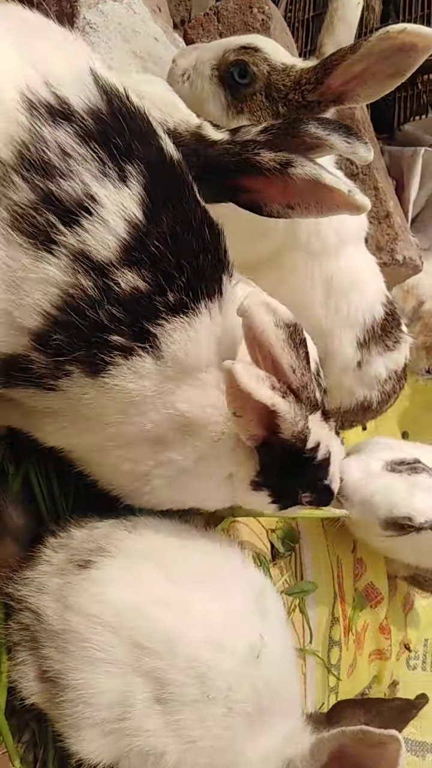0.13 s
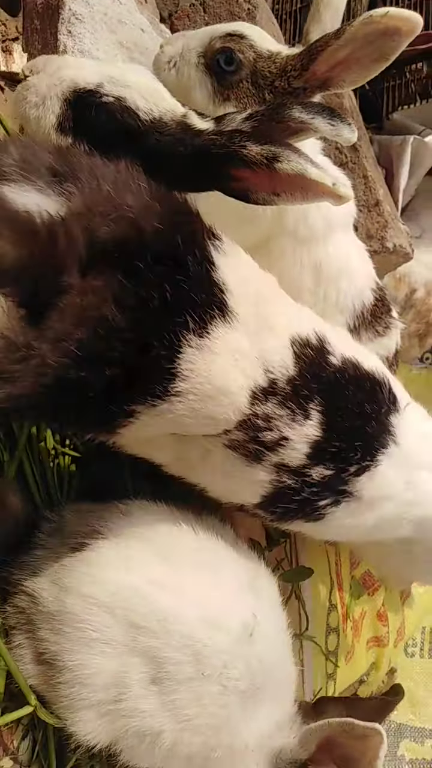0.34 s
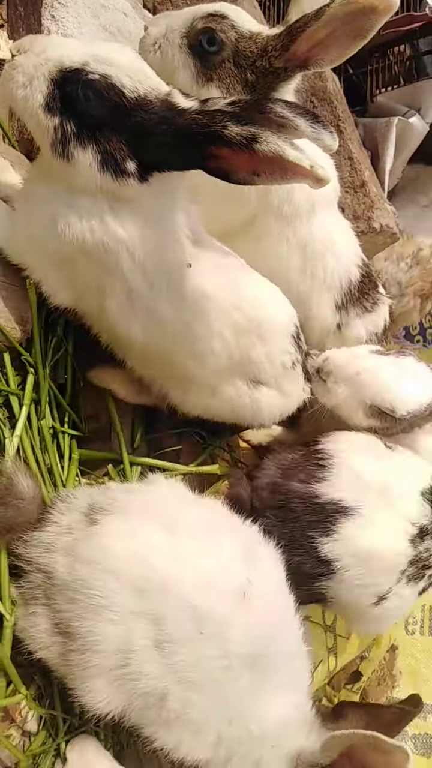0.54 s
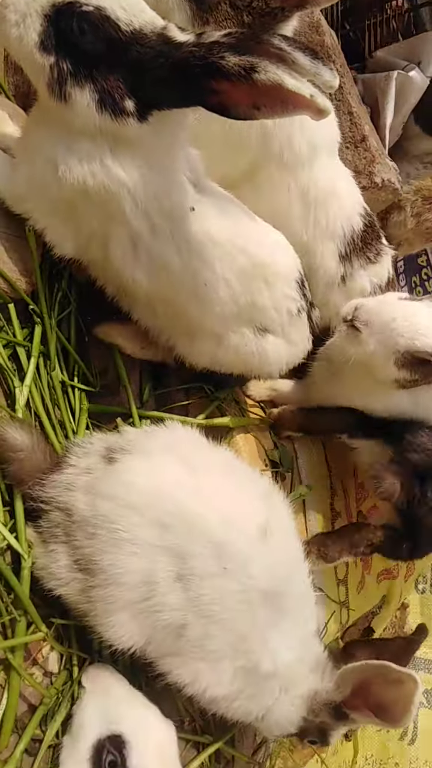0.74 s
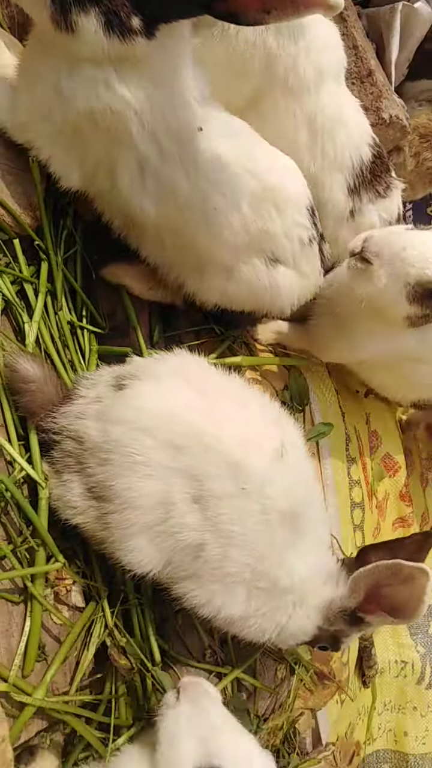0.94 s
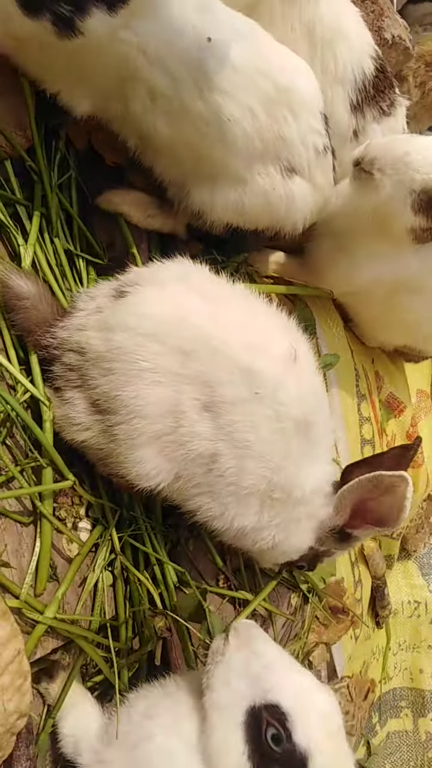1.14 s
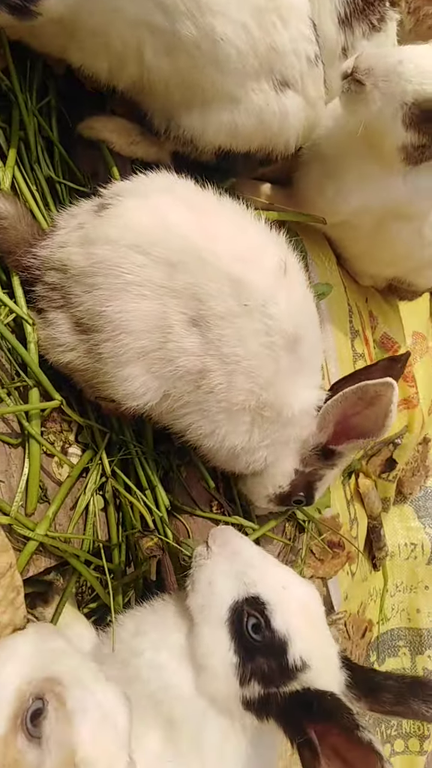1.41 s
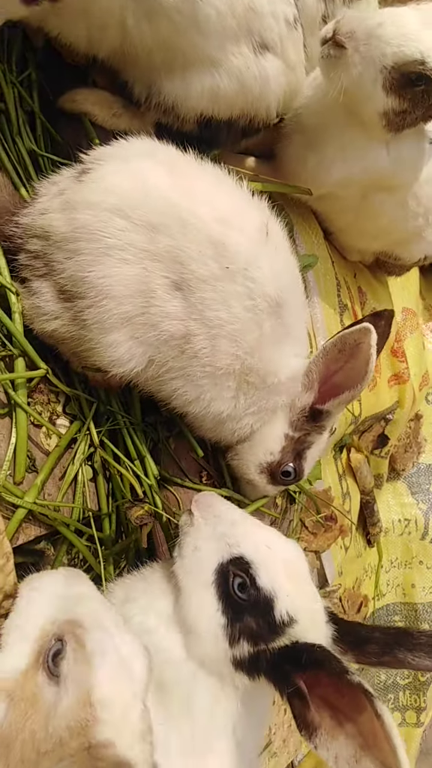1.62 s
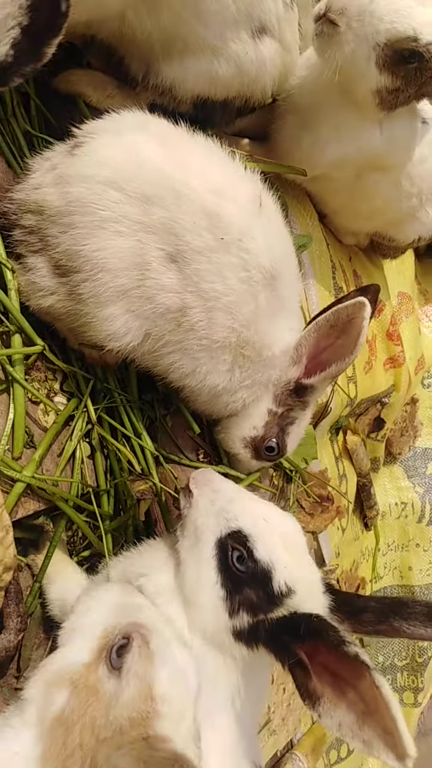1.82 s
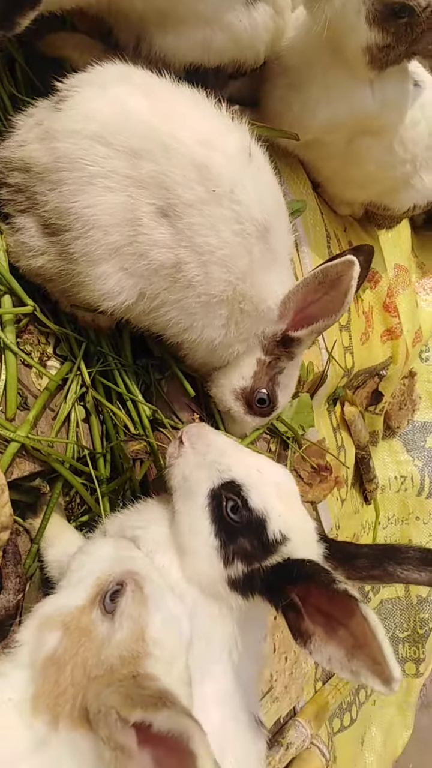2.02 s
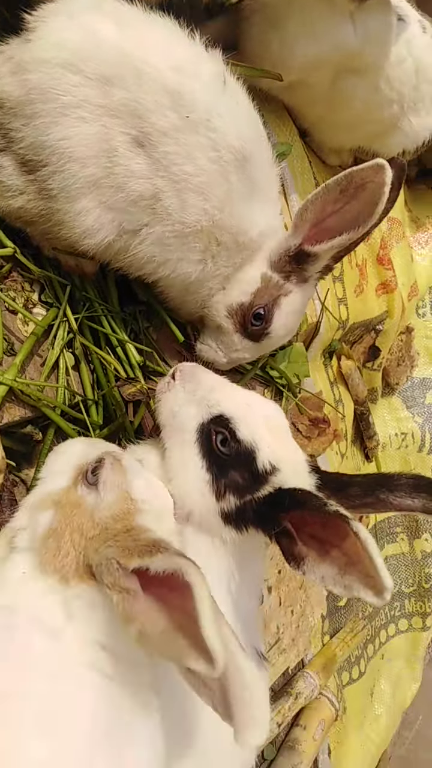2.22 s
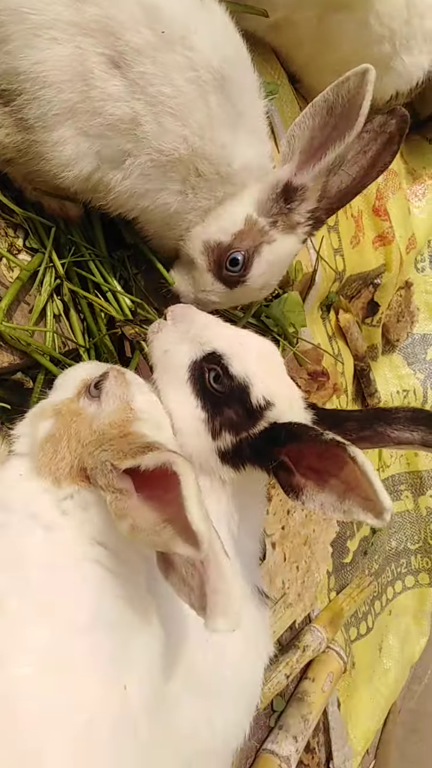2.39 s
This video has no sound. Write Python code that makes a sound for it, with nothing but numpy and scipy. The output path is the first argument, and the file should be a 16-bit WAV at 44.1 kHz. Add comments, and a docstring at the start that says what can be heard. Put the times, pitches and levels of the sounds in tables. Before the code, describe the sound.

Crisp grass rustling and stem snaps from feeding rabbits, a thumping hop, then echoing sparrow chirps

```python
"""Rabbits feed on cut greens spread on a plastic sack in a walled yard, over a wavering hum, rumble and still air.
From the start jaws and paws rustle the stems: strokes of hiss and crackle, mostly on the right as they brighten.
At 0.2 s stems snap with short rings; just after 0.5 s a rabbit hops, and its paws knock as damped tones.
Sparrows give a few notes at the start and many from 0.67 s on: gliding whistles from the left, deep in echo.
Fur and paws scuffle on the sack, loudest at the hop; faint blurred noise bands come and go in the distance."""
import sys
import numpy as np
from scipy import signal
from scipy.fft import rfft, irfft, next_fast_len
from scipy.io import wavfile
from scipy.ndimage import uniform_filter1d, map_coordinates

SR = 44100
rng = np.random.default_rng(int(sys.argv[2]) if len(sys.argv) > 2 else 0)


def linear_from_db(decibels):
    """Turn decibels (scalar or array-like) into linear amplitude factors; 0 gives 1."""
    return 10 ** (np.asarray(decibels, float) / 20)


def pcm_store(signal):
    """Save signal as 16-bit PCM."""
    levels = np.round(np.clip(np.atleast_2d(signal), -1, 1) * 32767)
    wavfile.write(sys.argv[1], SR, levels.astype(np.int16).T)


N = 112454  # length in samples
LEAD_S = 0.1  # room ahead of time zero for sounds that have already begun


def unit(x):
    """Scales x to an rms of 1."""
    return x / np.sqrt(np.mean(x ** 2) + 1e-20)


def along(points, hz):
    """Reads a (pitch_hz, level_db) table on a log pitch axis, dropping sharply beyond its ends."""
    f, v = np.transpose(points)
    return np.interp(np.log(hz + 1), np.log(f + 1), v, left=v[0] - 20, right=v[-1] - 40)


def curve(rows):
    """Reads a (time_s, level_db) table at every sample."""
    return np.interp(np.arange(N) / SR, *np.transpose(rows))


def wobble(rate, size=N):
    """A smooth random curve through `rate` random points a second."""
    points = rng.standard_normal(size // 20 + 9)
    return map_coordinates(points, [2 + np.arange(size) * rate / SR], mode="mirror")


def filtered(x, response):
    """Multiplies the spectrum of x by a response that depends on frequency."""
    m = next_fast_len(N + 8192)
    return irfft(rfft(x, m) * response(np.fft.rfftfreq(m, 1 / SR)), m)[..., :N]


def pair(x, alike):
    """Mixes two unrelated signals into left and right; alike 0 is unrelated, 1 is identical."""
    u = np.arccos(np.clip(alike, 0, 1)) / 2
    shared = np.cos(u) * x[0]
    opposed = np.sin(u) * x[1]
    return np.array([shared + opposed, shared - opposed])


def rush(spectrum, alike, x=None):
    """Colours stereo noise, or a given signal x, with a spectrum and scales it to an rms of 1."""
    x = rng.standard_normal((2, N)) if x is None else x
    return unit(filtered(pair(x, alike), lambda hz: linear_from_db(along(spectrum, hz))))


def patches(x, depth_db):
    """Gives x random patches of gain in time and frequency, at an rms of 1."""
    z = signal.stft(x, nperseg=512)[2]
    field = uniform_filter1d(rng.standard_normal(z.shape), 7, 1)
    field = uniform_filter1d(field, 7, 2)
    return unit(signal.istft(z * linear_from_db(depth_db * unit(field)), nperseg=512)[1][:, :N])


def crackle(per_s):
    """Sparse clicks of varied size, unrelated in the two channels."""
    clicks = rng.random((2, N)) < per_s / SR
    return clicks * rng.uniform(-1, 1, (2, N)) * linear_from_db(rng.uniform(-12, 0, (2, N)))


def sides(db):
    """Left and right gains for a left-minus-right level difference."""
    return linear_from_db(np.array([db / 2, -db / 2]))


def add(out, s, x):
    """Mixes x into out at time s; out starts LEAD_S early."""
    i = round((s + LEAD_S) * SR)
    out[:, i:i + x.shape[1]] += x


def trimmed(out):
    """Cuts off the lead-in and the overhang."""
    return out[:, round(LEAD_S * SR):][:, :N]


# how long the yard's echo takes to fall by 60 dB: pitch_hz, t60_s
YARD_DECAY = [(300, 0.47), (3000, 0.63), (6000, 0.5), (12000, 0.17)]


def yard(x):
    """Walls return a dense echo: fresh noise in each ear that decays at its own speed at each pitch."""
    hz, t, z = signal.stft(rng.standard_normal((2, SR // 2)), SR, nperseg=256)
    t60 = np.interp(hz, *np.transpose(YARD_DECAY))[:, None]
    tail = signal.istft(z * linear_from_db(-60 * t / t60), SR, nperseg=256)[1]
    return signal.fftconvolve(x[None], tail / np.linalg.norm(tail[0]), axes=1)


# colour of the still air: pitch_hz, relative level_db per Hz
AIR_COLOUR = [(30, 20), (300, 9), (700, 3), (2000, -16), (4000, -40), (14000, -26)]


def air():
    """Still air is a faint steady noise with patches of gain."""
    level_db = -69.5
    return linear_from_db(level_db) * patches(rush(AIR_COLOUR, 0.7), depth_db=3.5)


# loudness of the distant rumble: time_s, level_db
RUMBLE_LEVEL = [(0.0, -52), (0.05, -44), (0.13, -57), (0.16, -49), (0.21, -61.5), (0.42, -51.5),
                (0.44, -38.5), (0.57, -52), (0.59, -34.5), (0.66, -46), (0.69, -49.5), (0.96, -49.5),
                (1.13, -63), (1.15, -53.5), (1.24, -59.5), (1.31, -54), (1.45, -57.5), (1.49, -59.5),
                (1.71, -54.5), (1.74, -51), (1.78, -51.5), (1.96, -59), (2.47, -56), (2.55, -65)]
# colour of the distant rumble: pitch_hz, relative level_db per Hz
RUMBLE_COLOUR = [(25, -30), (45, -4), (80, -0.5), (125, 3), (165, -5), (210, -6), (300, -9), (450, -15),
                 (600, -38.5)]


def rumble():
    """Distant rumble is low noise, nearly the same in both ears, whose loudness comes in lumps."""
    return rush(RUMBLE_COLOUR, 0.9) * linear_from_db(curve(RUMBLE_LEVEL) + 1.5 * wobble(15))


# loudness of the hum: time_s, level_db
HUM_LEVEL = [(0.0, -61), (0.09, -49), (0.13, -60.5), (0.32, -45), (0.39, -53), (0.42, -39.5), (0.51, -56.5),
             (0.56, -45.5), (0.77, -56.5), (0.85, -47), (0.89, -55.5), (1.04, -43), (1.3, -57.5),
             (1.32, -48.5), (1.56, -98), (1.65, -47.5), (1.71, -65), (1.74, -45.5), (1.94, -69),
             (1.99, -56.5), (2.09, -70), (2.16, -56), (2.27, -99), (2.3, -56), (2.4, -52.5), (2.47, -77),
             (2.52, -48), (2.55, -57)]


def hum():
    """A low hum is a drifting tone inside a narrow band of noise, wavering in loudness."""
    centre_hz, drift_hz = 387.4, 4
    width_hz, skirt_hz, skirt_db = 12.6, 60, -7
    line_db, flutter_db = 1, 2  # tone over the noise band; random waver

    def peak(f):
        core = np.exp(-((f - centre_hz) / width_hz) ** 2)
        return core + linear_from_db(skirt_db) * np.exp(-((f - centre_hz) / skirt_hz) ** 2)

    phase = 2 * np.pi * np.cumsum(centre_hz + drift_hz * wobble(18)) / SR
    line = np.sqrt(2) * np.sin(phase)  # rms 1
    blur = unit(filtered(pair(rng.standard_normal((2, N)), 0.42), peak))
    tone = unit(linear_from_db(line_db) * line + blur)
    return tone * linear_from_db(curve(HUM_LEVEL) + flutter_db * wobble(44.52))


# faint far-off tones: start_s, t60_s, pitch_hz, width_hz, level_db
FAINT_TONES = [(-.02, 0.6, 191.5, 34, -39), (1.64, 1, 880, 310, -73.5), (0.198, 0.029, 1670, 149, -54.5),
               (.21, 0.11, 883, 60, -66), (0.282, 1, 1090, 89, -55), (.58, 0.68, 213, 30.6, -40),
               (.63, 0.31, 640, 151, -73), (0.743, 0.32, 810, 131, -52), (0.748, 0.25, 2010, 201, -49.5),
               (.87, 0.16, 747, 80, -56), (.99, 0.61, 653, 60, -65), (1.383, 0.52, 686, 50.4, -61),
               (1.389, 0.23, 1226, 80.6, -61), (1.587, 0.04, 2070, 224, -57.5), (1.661, 0.4, 192, 25, -44),
               (1.73, 0.9, 313, 30, -47.5), (1.902, 0.22, 2390, 264, -50.5), (.56, 0.6, 610, 280, -45.5),
               (1.47, 1, 88, 43, -53.5), (2.009, 0.51, 996, 60, -65), (2.081, 0.39, 840, 30, -69.5),
               (2.124, 0.49, 275.6, 25.5, -46), (2.293, 0.7, 324, 31, -50)]
# the far-off tones lean right near 200 Hz: pitch_hz, left_minus_right_db
FAR_LEAN = [(130, 2), (195, -17.5), (260, 1.5)]


def blurs():
    """Faint blurred tones are narrow bands of noise that swell quickly and fade."""
    t = np.arange(N) / SR
    rise_s = 0.029  # climbs the last 20 dB to the peak
    out = 0
    for s, t60, hz, width_hz, db in FAINT_TONES:
        def response(f):
            lean = sides(np.interp(f, *np.transpose(FAR_LEAN)))
            return lean * np.exp(-((f - hz) / width_hz) ** 2)

        band = unit(filtered(pair(rng.standard_normal((2, N)), 0.42), response))
        after = t - s - 0.015  # time from the peak
        loss_db = np.where(after < 0, 20 * (after / rise_s) ** 2, 60 * after / t60)
        out = out + band * linear_from_db(db - loss_db)
    return out


# sparrow notes before the direct and echo gains:
# start_s, length_s, first_pitch_hz, last_pitch_hz, level_db, warble_hz (pitch scatter)
SPARROW_NOTES = [(-.06, 0.072, 5166, 4377, -41.5, 537), (-.02, 0.048, 4400, 3180, -41, 463),
                 (0.121, 0.033, 5800, 6700, -49.5, 295), (0.669, 0.021, 6810, 6670, -41, 202),
                 (0.689, 0.02, 4610, 5960, -33.5, 207), (0.712, .026, 5100, 3460, -38.5, 450),
                 (0.739, 0.01, 4280, 5150, -40, 400), (0.762, 0.014, 3063, 3900, -36.5, 102),
                 (0.781, 0.016, 3400, 4450, -41.5, 398), (0.926, .016, 3410, 3360, -42.5, 149),
                 (0.93, 0.0453, 3100, 2637, -44.5, 153), (1.084, 0.02, 3740, 3684, -41, 90.5),
                 (1.092, 0.04, 3285, 2735, -45, 304), (1.111, 0.057, 4650, 4750, -50, 596),
                 (1.278, 0.09, 5000, 4460, -49.5, 433), (1.55, 0.012, 3300, 3300, -53, 79),
                 (1.564, 0.064, 3870, 4924, -41.5, 408), (1.596, 0.043, 6150, 6840, -41, 446),
                 (1.617, 0.038, 5000, 5336, -34.5, 453), (1.646, 0.046, 4105, 4600, -39, 557),
                 (1.698, 0.035, 4104, 2954, -33.5, 460), (1.772, 0.036, 5300, 5360, -45, 200),
                 (1.89, 0.044, 5590, 3138, -43.5, 550), (1.91, 0.044, 4000, 4980, -43.5, 510),
                 (2.01, 0.021, 5200, 3400, -46, 293), (2.057, 0.045, 3400, 2923, -46.5, 208),
                 (2.044, 0.027, 4480, 4360, -46.5, 297), (2.104, 0.023, 5250, 5260, -41.5, 150),
                 (2.1, .06, 4530, 4105, -53, 396), (2.144, 0.015, 5090, 5350, -44, 152),
                 (2.196, 0.029, 4620, 5766, -42, 413), (2.193, 0.042, 8270, 6900, -62, 313),
                 (2.46, .05, 7570, 7700, -63, 388), (1.304, 0.062, 4270, 3780, -55, 296),
                 (1.368, 0.07, 5014, 4420, -51.5, 360), (-.03, 0.024, 6100, 6070, -48, 500),
                 (2.08, 0.05, 2907, 2684, -56, 201), (2.014, 0.02, 3510, 3090, -42.5, 205),
                 (2.331, 0.091, 3393, 2896, -56.5, 79), (2.442, 0.038, 5230, 5560, -41, 350),
                 (2.485, 0.037, 6680, 6720, -48, 197), (2.497, 0.057, 3570, 5680, -40, 330),
                 (2.515, 0.065, 5650, 4290, -36, 465)]


def sparrows():
    """Each note is a hoarse, unsteady whistle that glides, mostly heard through the yard."""
    direct_db, direct_pan_db = 0.5, 10  # pans are left minus right
    echo_db, echo_pan_db, echo_delay_s = 2.5, 5, 0.009
    left_lag_s = 0.00025  # the left channel hears the direct notes this much later
    warbles_per_s, buzz_db, buzz_per_s, overtone_db = 170, 4.5, 250, -48
    lag = round(left_lag_s * SR)
    out = np.zeros((2, N + 2 * SR))
    for s, length, hz0, hz1, db, warble_hz in SPARROW_NOTES:
        t = np.arange(round(length * SR)) / SR
        glide = hz0 + (hz1 - hz0) * t / length
        warble = np.sin(2 * np.pi * warbles_per_s * t + 2 * wobble(warbles_per_s, len(t)))
        phase = 2 * np.pi * np.cumsum(glide + warble_hz * warble) / SR
        swell = np.sin(np.pi * t / length) ** 0.9
        shape = linear_from_db(db + buzz_db * wobble(buzz_per_s, len(t))) * swell
        note = shape * (np.sin(phase) + linear_from_db(overtone_db) * np.sin(2 * phase))
        direct = np.array([np.pad(note, (lag, 0)), np.pad(note, (0, lag))])
        add(out, s, linear_from_db(direct_db) * sides(direct_pan_db)[:, None] * direct)
        add(out, s + echo_delay_s, linear_from_db(echo_db) * sides(echo_pan_db)[:, None] * yard(note))
    return trimmed(out)


# loudness of fur and paws on the sack: time_s, level_db
SCUFFLE_LEVEL = [(0.0, -87), (0.03, -68.5), (0.17, -79), (0.2, -80.5), (0.23, -71), (0.33, -55.5),
                 (0.5, -45), (0.53, -40.5), (0.545, -38), (0.72, -71), (0.74, -66), (0.82, -65.5),
                 (1.06, -62), (1.16, -71.5), (1.26, -66.5), (1.31, -70), (1.4, -73.5), (1.86, -74.5),
                 (1.91, -68.5), (2.0, -76), (2.07, -67), (2.16, -75.5), (2.51, -76.5), (2.55, -68)]
# colour of the plastic sack: pitch_hz, relative level_db per Hz
SACK_COLOUR = [(450, 17), (600, -8), (900, -4.5), (1500, -1), (2400, -0.5), (3200, -5)]


def scuffle():
    """Fur and paws drag on the sack as patchy noise in lumps, with small ticks."""
    lumps_db, ticks_db = 2, -7  # random waver; ticks against the drag
    drag = patches(rush(SACK_COLOUR, 0.073), depth_db=5.5)
    ticks = linear_from_db(ticks_db) * rush(SACK_COLOUR, 0.15, crackle(200))
    return linear_from_db(curve(SCUFFLE_LEVEL) + lumps_db * wobble(36.4)) * (drag + ticks)


# paws on the hollow ground and sack: start_s, level_db (6 dB is added when played), pitch_hz, t60_s
PAW_KNOCKS = [(0.433, -45, 1130, 0.049), (0.442, -25.5, 97.5, 0.094), (.537, -12, 448, 0.016),
              (0.5443, -5, 435, 0.012), (.433, -36, 1840, 0.011), (0.5382, -29, 2400, 0.005),
              (.538, -34, 544, 0.089), (.538, -16.5, 990, 0.0068), (0.506, -28, 1090, 0.0072),
              (.551, -32, 2520, 0.0064), (.568, -65, 2160, 0.0063), (0.602, -30, 189, 0.062),
              (0.647, -23.5, 278, 0.024), (0.748, -33, 1990, 0.011), (1.299, -36.5, 104.6, 0.15),
              (1.734, -19, 111, 0.039)]


def knocks():
    """Each knock of a paw sounds as one damped tone, the same in both ears."""
    out, t = np.zeros((2, N + 2 * SR)), np.arange(SR // 4) / SR
    for s, db, hz, t60 in PAW_KNOCKS:
        onset = 1 - np.exp(-t * hz * 0.6)
        knock = linear_from_db(db + 6 - 60 * t / t60) * np.sin(2 * np.pi * hz * t) * onset
        add(out, s, np.ones((2, 1)) * knock)
    return trimmed(out)


# snapping stems: start_s, level_db (before onset and crack), pitch_hz, left_minus_right_db
STEM_SNAPS = [(.1938, -30, 5500, 0), (.1965, -31, 3200, 0), (.1977, -12, 6000, 2), (.2007, -14, 6400, 2),
              (.2013, -19, 6400, 2), (.2042, -12, 6800, -2), (.2077, -28, 7000, 0), (.2593, -30, 6000, 1),
              (.3157, -25, 6500, 1), (.325, -29, 12500, -3), (.5068, -23, 5300, 1), (.6355, -27, 6500, 1),
              (.823, -35, 7500, 3), (1.0245, -19, 7800, 2), (1.043, -22, 6000, 6), (1.057, -29, 6600, 4),
              (1.161, -36, 11000, -5), (1.173, -37, 12000, -5), (1.891, -37, 10500, -5),
              (2.109, -36, 10500, -5)]


def snaps():
    """A snapping stem gives a very brief ring with a noisy crack, and a little yard echo."""
    t60_s, crack_gain, echo_db = 0.0028, 0.6, -10.5
    out, t = np.zeros((2, N + 2 * SR)), np.arange(SR // 4) / SR
    for s, db, hz, pan_db in STEM_SNAPS:
        crack = np.diff(rng.standard_normal((2, len(t) + 2)), 2) / 2  # bright noise
        ring = np.sin(2 * np.pi * hz * t)
        shape = linear_from_db(db - 60 * t / t60_s) * (1 - np.exp(-t / 0.0001))
        snap = shape * (ring + crack_gain * crack)
        add(out, s, sides(pan_db)[:, None] * snap)
        add(out, s, linear_from_db(echo_db) * yard(snap[0, :900]))
    return trimmed(out)


# strokes through the stems: peak_s, rise_s (last 20 dB), fall_t60_s, level_db, left_minus_right_db
STEM_STROKES = [(.0, .03, 0.39, -47, 1), (.14, 0.015, 1, -56, -12), (0.288, 0.063, 0.27, -40.5, -2),
                (0.318, 0.025, 0.63, -37, -7), (0.361, 0.083, 0.42, -36, -0.5),
                (.44, 0.02, 0.6, -41.5, -0.5), (0.509, 0.0094, 0.074, -35, 0.5),
                (0.558, 0.033, 0.25, -40.5, -0.5), (0.639, 0.044, 1, -41, -3.5), (.76, 0.033, 1, -47, 2),
                (0.833, 0.036, 0.94, -40, -2.5), (1.012, 0.059, 0.65, -45.5, -8.5),
                (1.052, 0.031, 0.29, -37.5, 1), (1.163, 0.0095, 0.49, -49.5, -3),
                (1.256, 0.03, 0.25, -40, -6), (1.461, 0.026, 0.14, -58, -16.5),
                (1.508, 0.059, 0.42, -61, -18), (1.628, 0.044, 0.8, -55.5, 11),
                (1.704, 0.039, 0.26, -40.5, -5), (1.898, 0.023, 0.35, -42, -7.5),
                (2.112, 0.026, 0.47, -51, -7.5), (2.25, 0.062, 1, -62, -6), (2.52, 0.025, 1, -60, 11)]
# colour of the rustling stems: pitch_hz, relative level_db per Hz
STEM_COLOUR = [(1200, -33), (2000, -15), (2800, -4.5), (4000, -2), (6500, -2.5), (8500, -7.5),
               (11000, -8.5), (14000, -13)]
# the rustle leans further right as it gets brighter: pitch_hz, left_minus_right_db
STEM_LEAN = [(3000, 6.5), (7000, 6), (12000, -6.5)]


def stems():
    """Rubbed stems hiss and crackle under each stroke: a smooth rise, an exponential fall."""
    crackle_db = -10  # against the hiss
    t = np.arange(N) / SR
    power = 0
    for s, rise, fall, db, pan_db in STEM_STROKES:
        loss_db = np.where(t < s, 20 * ((t - s) / rise) ** 2, 60 * (t - s) / fall)
        power = power + (linear_from_db(db - loss_db) * sides(pan_db)[:, None]) ** 2
    rustle = rush(STEM_COLOUR, 0.033) + linear_from_db(crackle_db) * rush(STEM_COLOUR, 0.47, crackle(900))
    rustle = filtered(rustle, lambda hz: sides(np.interp(hz, *np.transpose(STEM_LEAN))))
    return np.sqrt(power) * linear_from_db(1.28 * wobble(45.33)) * patches(rustle, depth_db=3.5)


def scene():
    """All sources together at the two microphones."""
    background = air() + rumble() + hum() + blurs()
    return background + sparrows() + scuffle() + knocks() + snaps() + stems()


def top_cut(x):
    """Nothing passes above the cut-off."""
    return signal.sosfilt(signal.butter(12, 15620, fs=SR, output="sos"), x)


def record(dry):
    """The phone rolls off the bottom gently and the top steeply."""
    bottom_hz, top_hz = 53, 14350  # each is 6 dB down here

    def band(hz):
        treble_cut = 1 / (1 + (hz / top_hz) ** 60)
        bass_cut = hz ** 2 / (hz ** 2 + bottom_hz ** 2)
        return treble_cut * bass_cut

    mix = filtered(dry, band)
    return top_cut(mix)


dry = scene()
out = record(dry)
pcm_store(out)
```